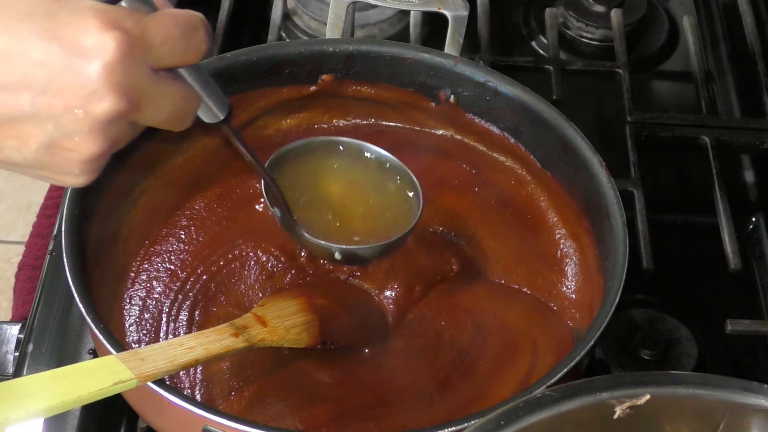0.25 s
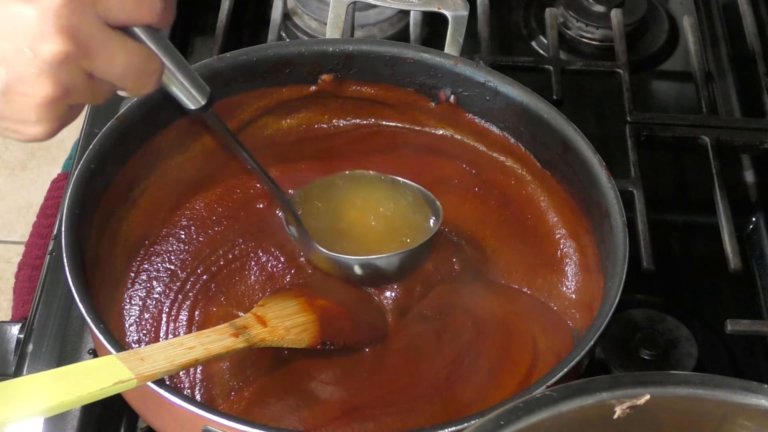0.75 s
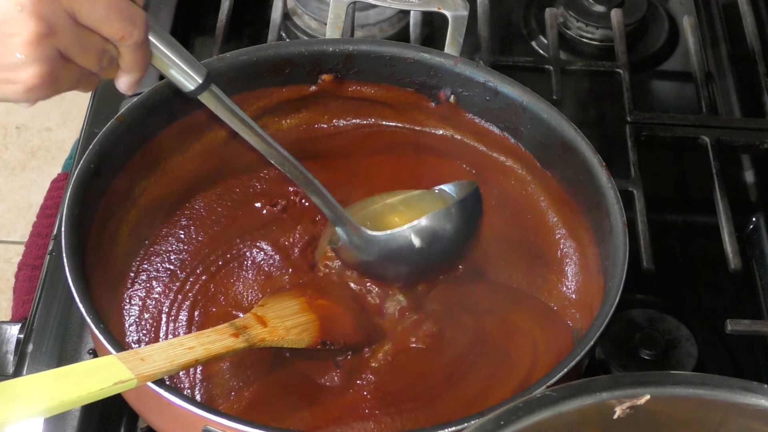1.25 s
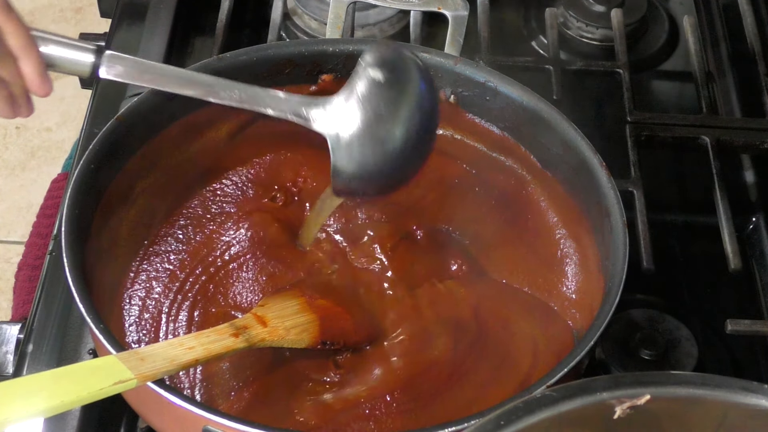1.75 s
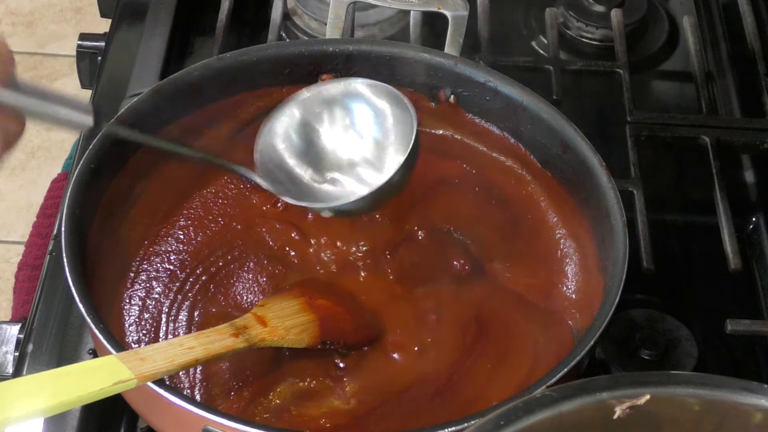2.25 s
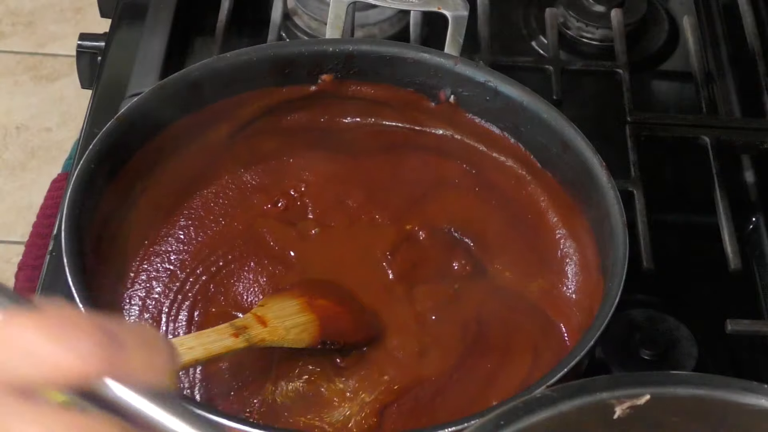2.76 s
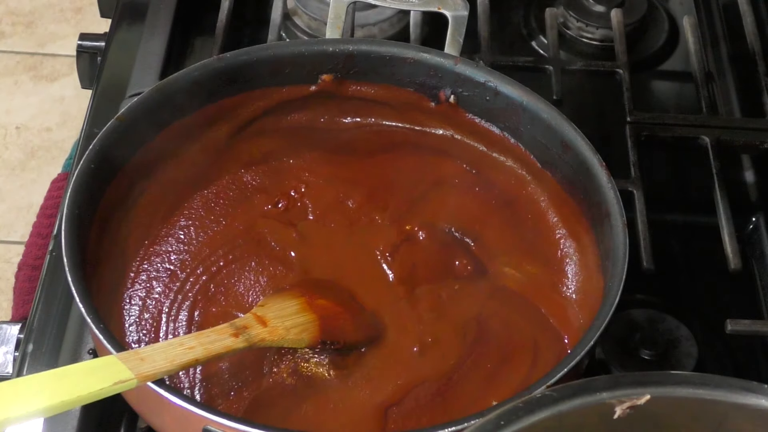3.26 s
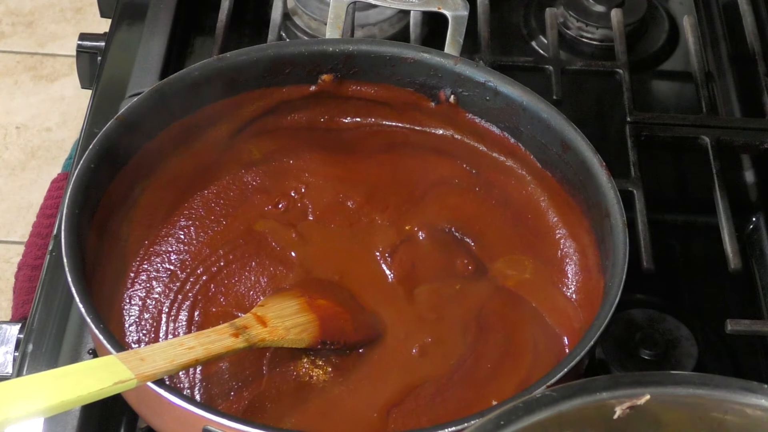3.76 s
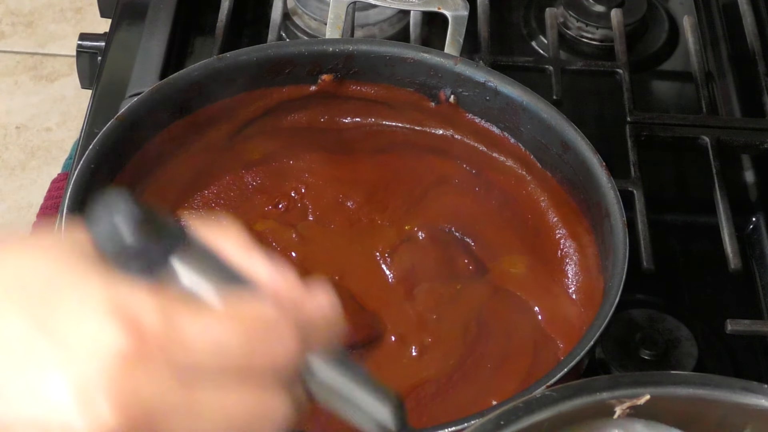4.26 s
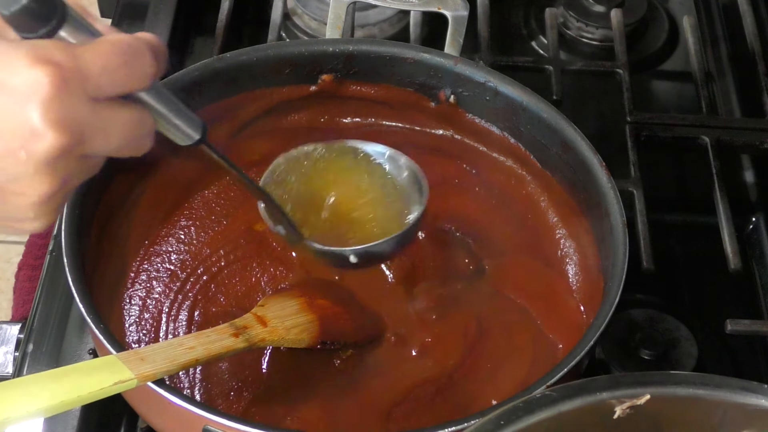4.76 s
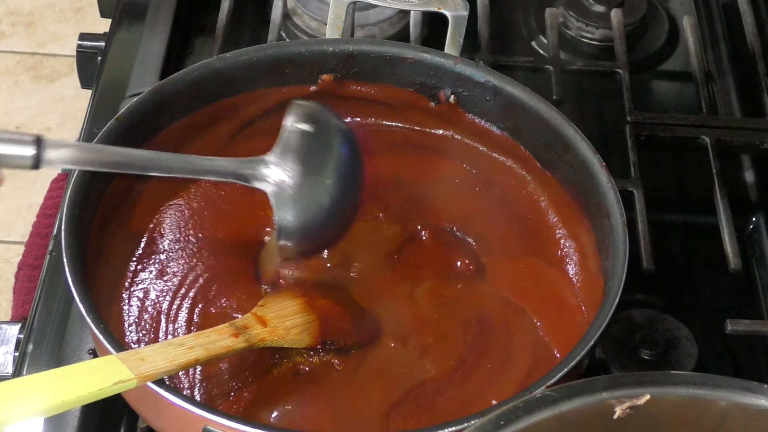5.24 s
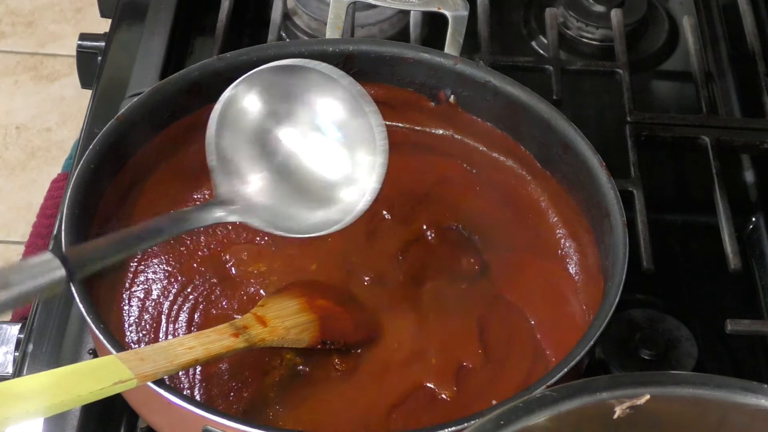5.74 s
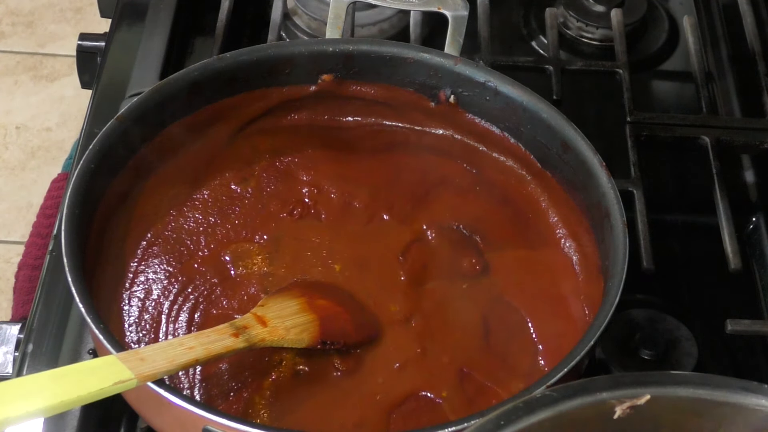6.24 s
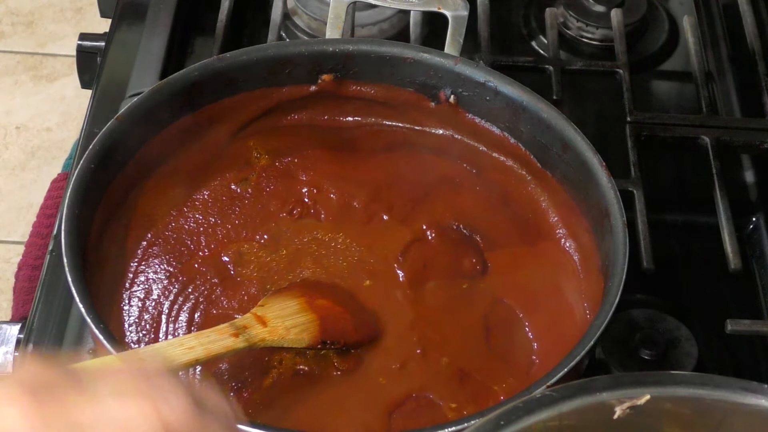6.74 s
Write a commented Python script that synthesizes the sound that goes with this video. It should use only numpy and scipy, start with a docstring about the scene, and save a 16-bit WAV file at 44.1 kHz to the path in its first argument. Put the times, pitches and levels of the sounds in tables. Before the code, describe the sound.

Bubbles pop and spit in a pan of sauce on a gas stove, until a ladle is set down hard on metal, ringing.

```python
"""Thick sauce simmers in a wide pan on a gas stove. Steam bubbles burst with short wet tones as
their hollows ring, droplets spit, and escaping steam gurgles and puffs. Under it all the burner
hums and hisses, and the kitchen gives the sauce a short echo. Near the end a steel ladle is
put down hard on metal: it rings and rocks to rest while a deep rumble swells and fades."""
import sys
import numpy as np
from scipy import signal
from scipy.fft import rfft, irfft, next_fast_len
from scipy.io import wavfile
from scipy.ndimage import map_coordinates

SR = 44100
rng = np.random.default_rng(int(sys.argv[2]) if len(sys.argv) > 2 else 0)


def log_audio(samples):
    """Write samples as a 16-bit WAV file to the path given in sys.argv[1]."""
    # one column per channel
    frames = np.atleast_2d(samples).T
    # limit to full scale, then quantise
    limited = np.clip(frames, -1, 1)
    pcm = np.round(limited * 32767).astype(np.int16)
    wavfile.write(sys.argv[1], SR, pcm)


N = 308609

# Tone colour of the burner's rumble, the sauce's seething and its fine fizz: f/Hz, level/dB
BURNER_COLOUR = [(15, -67), (25, -50), (37, -11.5), (47, -52), (69, -2.5), (103, -16), (189, -2),
                 (217, -6.5), (261, 0), (324, -6.5), (507, -11.5), (531, -23.5), (565, -19), (857, -25.5),
                 (1000, -15.5), (1300, -65), (2200, -120)]
SEETHE_COLOUR = [(470, -35), (800, -20), (995, -1), (1190, -1.5), (1990, -3), (2160, -2), (2360, -0.5),
                 (2820, -5.5), (3730, -10), (5500, -29), (7150, -70), (12100, -120)]
FIZZ_COLOUR = [(2650, -26), (4500, -0.5), (6880, -6.5), (7880, -7), (8550, -3), (11800, -0.5), (15100, -1),
               (16100, -5), (16500, -37)]
# Faint whistles of the gas jets: f/Hz, width/Hz, level/dB
GAS_WHISTLES = [(1982, 54, -65), (3784, 200, -71.5)]
# How alike the noise is on the left and right: f/Hz, likeness (1 = the same)
STEREO_LIKENESS = [(60, 0.48), (150, 0.65), (380, 0.88), (950, 0.67), (2380, 0.45), (5980, 0.81),
                   (15000, 0.6)]
# How much louder the noise and the ladle are on the left: f/Hz, left minus right/dB
NOISE_BALANCE = [(60, 3.5), (180, 1), (550, -1.0), (1650, 1.5), (4970, 0.5), (15000, -0.5)]
LADLE_BALANCE = [(150, 5.5), (350, -2.5), (1200, 0), (3000, -0.5), (12000, 0)]
# Bursting bubbles: t/s, level/dB, f/Hz, splash above the tone/dB
BUBBLE_BURSTS = [(0.0941, -35, 1510, -6.5), (0.1588, -35, 2540, -4.5), (0.1747, -40.5, 4080, -1),
                 (0.1812, -44, 1080, -10), (0.2522, -34, 2300, -9), (0.267, -34, 2560, 2.5),
                 (0.2837, -34.5, 2500, -8), (0.3217, -34, 3900, -16), (0.3244, -29, 4950, -6.5),
                 (0.3255, -29.5, 1170, -2), (0.4579, -40.5, 1170, 1), (0.4756, -46, 3940, 3),
                 (0.4848, -35.5, 2760, 4.5), (0.691, -41, 1350, -10), (0.7062, -36, 4500, 3),
                 (0.7123, -31.5, 1240, -10), (0.7806, -27.5, 2500, -9), (0.9237, -36, 1180, -1),
                 (0.9282, -39, 1010, -8), (0.9404, -48, 1045, -5), (0.9459, -40.5, 4400, 2),
                 (1.1827, -32.5, 1260, -4), (1.2079, -37, 4800, -5), (1.303, -51, 1540, -1),
                 (1.3345, -36, 4360, -13), (1.343, -31, 2360, -11), (1.3912, -45, 1910, 3),
                 (1.4391, -37.5, 1750, -27), (1.565, -49.5, 2240, 4), (1.615, -43, 2790, -14),
                 (1.6933, -31, 2340, -5), (1.89, -40, 1420, -4), (1.9038, -39.5, 1200, -12),
                 (1.95, -50, 2420, -2), (1.9771, -42, 1270, -2), (1.989, -39, 4550, -10),
                 (2.019, -39, 1650, 1), (2.0448, -41.5, 4440, -20), (2.0458, -40, 2450, 1),
                 (2.0724, -34, 1720, -8), (2.124, -42, 4800, -16), (2.1655, -41, 1110, -5),
                 (2.1812, -39.5, 2140, -8), (2.2134, -40, 2160, -2.5), (2.588, -41, 1470, -4),
                 (2.777, -37, 2360, -19), (2.792, -34, 2230, 1.5), (2.949, -47, 2900, 6),
                 (2.9674, -48, 1380, 6), (3.1334, -44, 1160, -3), (3.1472, -31.5, 2400, -8.5),
                 (3.1589, -32.5, 2620, -2.5), (3.6762, -44.5, 3850, -1.5), (3.6897, -37, 1184, -30),
                 (3.7472, -42, 1160, -7), (3.7587, -42.5, 2480, 2.5), (3.774, -33, 2420, 0),
                 (3.7874, -35, 1750, -9), (3.8805, -49, 3360, 6), (3.8905, -30.5, 4570, -14),
                 (3.9558, -32, 1810, -30), (3.9688, -28.5, 3640, -14), (4.062, -52, 1630, -20),
                 (4.076, -43, 1960, -6.5), (4.1099, -46, 1610, -13), (4.766, -51, 2140, 2),
                 (4.9255, -42, 1160, -24), (4.9402, -28.5, 2400, -6.5), (4.9415, -32, 1170, -12),
                 (4.9434, -24.5, 4600, -16), (4.9772, -19, 2316, -23), (5.0115, -25.5, 2350, -11),
                 (5.0216, -45, 2270, -7), (5.0583, -42.5, 2540, 3), (5.0876, -34.5, 1450, -14),
                 (5.257, -46.5, 1290, 0), (5.462, -35, 1790, -5.5), (5.492, -40.5, 1730, -3.5),
                 (5.874, -46.5, 2200, 6), (6.244, -49.5, 2240, 9.5)]
# Spitting droplets: t/s, level/dB, f/Hz
DROPLET_SPITS = [(0.182, -34, 9650), (0.2835, -33, 11500), (0.3144, -37, 11500), (0.3254, -21.5, 7660),
                 (0.4858, -26, 10500), (0.7126, -33.5, 9600), (0.795, -50, 11000), (0.941, -32.5, 10900),
                 (0.952, -33.5, 10200), (1.1228, -52, 11700), (1.1844, -46, 10000), (1.1915, -25.5, 8140),
                 (1.258, -51, 11600), (1.265, -36.5, 9300), (1.3703, -44.5, 9410), (1.511, -42.5, 10400),
                 (1.6422, -42, 10300), (1.6929, -27.5, 7900), (1.83, -49, 6000), (1.9345, -49, 8000),
                 (1.949, -45, 8870), (1.9759, -45, 7500), (1.9884, -41, 7710), (1.9949, -36, 11100),
                 (2.0178, -40, 9240), (2.0252, -37, 9760), (2.0448, -31.5, 9800), (2.072, -47, 6900),
                 (2.124, -42, 10000), (2.166, -52, 7000), (2.2171, -40, 10600), (2.258, -42, 12950),
                 (2.487, -44, 9900), (2.7914, -35, 10700), (2.9485, -43, 9700), (3.7727, -38.5, 12000),
                 (3.8817, -41, 8600), (3.8891, -36, 6630), (3.9544, -39.5, 8000), (3.9644, -35, 11700),
                 (4.299, -52, 10700), (4.9472, -41, 10700), (4.9761, -29, 9300), (5.0204, -40, 8500),
                 (5.1908, -39, 8100), (5.215, -44, 12000), (5.3343, -43, 11200), (5.452, -44.5, 11400),
                 (5.7872, -45, 12400), (6.058, -52, 9700)]
# Escaping steam: t/s, level/dB, f/Hz, t60/s (t60 is the time a sound takes to fade by 60 dB)
STEAM_PUFFS = [(0.255, -57, 2470, 0.1), (1.30, -54, 2000, .15), (2.59, -59, 10000, .12),
               (2.966, -47, 5000, 0.036), (3.79, -47, 1720, 0.43), (4.065, -49, 1720, 0.39),
               (4.299, -58, 8500, 0.19), (4.982, -44.5, 2320, .15), (5.11, -49, 2180, 0.18),
               (6.058, -54, 7540, .15)]
# How long the kitchen echoes: f/Hz, t60/s
ECHO_DECAY = [(300, 0.77), (2000, 0.19), (8000, 0.27), (15000, 0.097)]
# Ladle hits: t/s, level/dB, centre f/Hz, width/Hz, rise/s, t60 of the damping by contact/s
LADLE_HITS = [(6.4343, -12, 1250, 19200, 0.00015, 1.45), (6.548, -11.5, 1600, 1200, 0.002, 0.18),
              (6.734, -10, 1630, 580, 0.0053, 0.07), (6.937, -17.5, 179, 500, 0.0054, 0.13)]
# Tones the steel rings with: f/Hz, level/dB, t60/s
STEEL_TONES = [(182, -17.5, 2), (370, -27, 2.5), (418, -22, 0.65), (485.5, -19.5, 1.35), (670, -36.5, 4.6),
               (1047, -20, 0.32), (1369, -28.5, 0.85), (1456, -25, 1.2), (1400, -26, 2.1), (1562, -31, 4.1),
               (1730, -26, 2.3), (2220, -20.5, 0.35), (2350, -28, 2.53), (2875, -9, 0.14),
               (2890, -23, 0.39), (3065, -19, 1.6), (3096, -20, 0.72), (3620, -21, 0.62),
               (3660, -19.5, 0.31), (4010, -29, 1.7), (4180, -16, 0.21), (4800, -33, .5),
               (4940, -8.5, 0.035), (5700, -29, 1.9), (5500, -38, 1.2), (8160, -38, 1.1), (9300, -45, 0.77)]
# The clash, a ringing too dense to hear as single tones: f/Hz, level/dB
CLASH_COLOUR = [(35, -54.5), (60, -22), (103, -48), (176, 7), (281, -26), (492, 13), (593, -24),
                (767, -10.5), (1380, 9.5), (1910, 2.5), (2970, 9.5), (3340, 4.5), (5720, 1.5), (7230, -12),
                (16000, -13)]
# How long the clash lasts: f/Hz, t60/s
CLASH_FADE = [(150, 1), (500, 1), (1600, 1.0), (3000, 1), (4600, 0.98), (5500, 0.81), (6500, 1),
              (9000, 0.84), (15000, 0.23)]
# Hums that linger after the first hit: f/Hz, width/Hz, level/dB
LINGERING_HUMS = [(447, 25, 0), (750, 760, -15), (1657, 86, -1), (2600, 980, -19.5), (5460, 630, -22)]

SEETHE_DB, FIZZ_DB = -60.5, -66  # calm sauce
SEETHE_DB_PER_BURST, FIZZ_DB_PER_SPIT = 0.57, 0.33
USUAL_HZ, USUAL_SPLASH_DB, RING_T60_S, SPLASH_T60_S = 2000, -44, 0.019, 0.033  # an ordinary burst
THUMP_DB, THUMP_DB_PER_SPLASH_DB, THUMP_DB_PER_OCTAVE = -56, 0.56, -3  # big, low bubbles thump hardest
PLOP_HZ, PLOP_WIDTH_HZ, PLOP_OVER_THUMP_DB, PLOP_T60_S = 633, 1150, 4.5, 0.029
SPREAD_S, SPREAD_DB = 1.0e-5, 1.7  # left-right scatter over the pan, in delay and level
DEEP_RUMBLE_HZ, DEEP_RUMBLE_DB = 45.7, -58
TOP_HZ = 15900


def amp(db):
    """Turns decibels into a factor to multiply by."""
    return 10 ** (np.asarray(db) / 20)


def unit(x):
    """Scales a sound to an average (rms) strength of 1."""
    return x / np.sqrt(np.mean(x ** 2) + 1e-20)


def fade(t, t60):
    """Falls by 60 dB every t60 seconds."""
    return amp(-60 * t / t60)


def rise(t, seconds):
    """Climbs from 0 towards 1, most of the way in the given time."""
    return 1 - np.exp(-t / seconds)


def along(points, hz):
    """Reads between the rows of an (f/Hz, value) table, on a log frequency scale."""
    f, v = np.transpose(points)
    return np.interp(np.log(hz + 1), np.log(f + 1), v)


def wobble(rate):
    """A smooth random curve through rate new values a second."""
    return map_coordinates(rng.standard_normal(int(N * rate / SR) + 4), [np.arange(N) * rate / SR])


def lumps(t, rate, db):
    """An uneven loudness that strays by about db, rate times a second."""
    return amp(db * np.interp(t * rate, np.arange(64), rng.standard_normal(64)))


def filtered(x, response):
    """Scales each frequency f in x by response(f)."""
    n = x.shape[-1]
    padded = next_fast_len(n + 2048)
    return irfft(rfft(x, padded) * response(np.fft.rfftfreq(padded, 1 / SR)), padded)[..., :n]


def resonance(f, centre_hz, width_hz):
    """A filter curve that favours frequencies near the centre."""
    return 1j * f * width_hz / (centre_hz ** 2 - f * f + 1j * f * width_hz)


def band_noise(t, hz, width_hz, steepness=2):
    """Noise around one pitch, as long as t."""
    return unit(filtered(rng.standard_normal(len(t)), lambda f: resonance(f, hz, width_hz) ** steepness))


def lean(pair, balance):
    """Tips each frequency to the left or right."""
    return filtered(pair, lambda f: amp(np.outer([.5, -.5], along(balance, f))))


def rush(gain):
    """Steady stereo noise coloured by gain(f), partly alike on both sides."""
    def split(f):
        angle = np.arccos(np.clip(along(STEREO_LIKENESS, f), -1, 1)) / 2
        return gain(f) * np.array([np.cos(angle), np.sin(angle)])

    mid, side = filtered(rng.standard_normal((2, N)), split)
    return unit(lean(np.array([mid + side, mid - side]), NOISE_BALANCE))


def dying_noises(decay, seconds, gain=np.ones_like):
    """Two noises in which each frequency fades at its own speed."""
    hz, t, bands = signal.stft(rng.standard_normal((2, int(seconds * SR))), SR, nperseg=256)
    bands = bands * gain(hz)[:, None] * fade(t, along(decay, hz)[:, None])
    return signal.istft(bands, SR, nperseg=256)[1]


def add(track, start_s, sound):
    """Mixes a sound into the track at the given time."""
    part = track[..., round(start_s * SR):][..., :sound.shape[-1]]
    part += sound[..., :part.shape[-1]]


def busy(events, reach_s=0.077):
    """A smooth count of the events near each moment."""
    times = np.arange(0, N / SR + .02, .02)
    gaps = times[:, None] - np.array(events)[:, 0]
    count = np.exp(-.5 * (gaps / reach_s) ** 2).sum(axis=1)
    return np.interp(np.arange(N) / SR, times, count)


def burner():
    """The gas flame rumbles with a slight flutter, and its jets whistle faintly."""
    rumble = amp(-56 + .8 * wobble(4)) * rush(lambda f: amp(along(BURNER_COLOUR, f)))
    jets = sum(amp(db) * rush(lambda f: np.abs(resonance(f, hz, width)) ** 2)
               for hz, width, db in GAS_WHISTLES)
    return rumble + jets


def simmer():
    """The sauce seethes and fizzes in quick small swells, louder where bursts and spits crowd."""
    swell_db = 1.2 * wobble(14)
    seethe_db = SEETHE_DB + SEETHE_DB_PER_BURST * busy(BUBBLE_BURSTS) + swell_db
    fizz_db = FIZZ_DB + FIZZ_DB_PER_SPIT * busy(DROPLET_SPITS) + .5 * swell_db
    seethe = amp(seethe_db) * rush(lambda f: amp(along(SEETHE_COLOUR, f)))
    fizz = amp(fizz_db) * rush(lambda f: amp(along(FIZZ_COLOUR, f)))
    return seethe + fizz


def bubble(hz, t60, splash_db, splash_t60, thump_db):
    """The hollow rings with rising pitch, the torn skin snaps and splashes, the sauce thumps the pan."""
    t = np.arange(SR // 8) / SR
    waver = np.cumsum(rng.standard_normal(len(t))) * hz * 2.5e-5  # the soft wall unsettles the pitch
    tone = np.sin(2 * np.pi * hz * (t + 1.2 * t * t) + waver) * fade(t, t60) * rise(t, 0.00025)
    splutter = lumps(t, rate=350, db=4.5) * rng.standard_normal(len(t))
    wet = filtered(splutter, lambda f: (resonance(f, 2100, 2200) * resonance(f, hz, 1.5 * hz)) ** 2)
    splash = amp(splash_db) * unit(wet) * fade(t, splash_t60)
    thump = amp(thump_db) * band_noise(t, hz=200, width_hz=200) * fade(t, 0.16)
    snap = amp(splash_db - 1) * band_noise(t, hz=3200, width_hz=4500, steepness=3) * fade(t, 0.0046)
    return tone + snap + (splash + thump) * rise(t, 0.0016)


def burst(db, hz, splash_db):
    """A bubble pops and its crater falls in with a plop. Big, low bubbles ring and splash longest."""
    t = np.arange(SR // 8) / SR
    pitch_ratio = hz / USUAL_HZ
    ring_t60 = RING_T60_S / pitch_ratio ** .5
    splash_t60 = SPLASH_T60_S / pitch_ratio ** .25
    extra_splash_db = db + splash_db - USUAL_SPLASH_DB
    thump_db = THUMP_DB + THUMP_DB_PER_SPLASH_DB * extra_splash_db
    thump_db += THUMP_DB_PER_OCTAVE * np.log2(pitch_ratio)
    plop = amp(thump_db + PLOP_OVER_THUMP_DB) * band_noise(t, PLOP_HZ, PLOP_WIDTH_HZ)
    plop *= fade(t, PLOP_T60_S) * rise(t, .0015)
    return plop + amp(db) * bubble(hz, ring_t60, splash_db, splash_t60, thump_db - db)


def spit(db, hz):
    """A droplet clicks, then gives a short, high crack."""
    t = np.arange(SR // 32) / SR
    noise = rng.standard_normal(len(t))
    crack = unit(filtered(noise, lambda f: resonance(f, hz, .55 * hz) ** 2 / (1 + 1j * f / 11000)))
    crack *= fade(t, 0.0098) * rise(t, 0.00032)
    click = amp(15.5) * filtered(1. * (t == 0), lambda f: resonance(f, hz, .9 * hz) ** 2)
    return amp(db - 2.5) * (crack + click)


def puff(db, hz, t60):
    """Steam escapes in lumps: a low gurgle through the sauce or a high hiss."""
    t = np.arange(SR // 5) / SR
    hiss = unit(lumps(t, rate=200, db=3.5) * band_noise(t, hz, 0.54 * hz))
    return amp(db) * hiss * fade(t, t60) * rise(t, 0.0057)


def sauce():
    """Bursts, spits and puffs spread over the pan, with faint random bubbles and droplets between."""
    out = np.zeros((2, N))

    def place(start_s, sound):
        side = rng.standard_normal()
        lag = round(side * SPREAD_S * SR)  # the far side hears it later
        pair = [np.roll(sound, max(delay, 0)) for delay in (-lag, lag)]
        add(out, start_s, amp(SPREAD_DB * side * np.array([[.5], [-.5]])) * pair)

    for table, source in ((BUBBLE_BURSTS, burst), (DROPLET_SPITS, spit), (STEAM_PUFFS, puff)):
        for start_s, *settings in table:
            place(start_s, source(*settings))
    for when, pitch, size in rng.random((70, 3)):
        pop = bubble(1100 * 2.6 ** pitch, t60=0.044, splash_db=-13.5, splash_t60=0.029, thump_db=-14)
        place(when * N / SR, amp(-59 + 5.9 * size) * pop)
    for when, pitch, size in rng.random((10, 3)):
        place(when * N / SR, spit(db=-53 + 4 * size, hz=7000 * 1.7 ** pitch))
    return out


def kitchen_echo(sound):
    """The pan wall and kitchen throw sound back; each short stretch gets its own echo tail."""
    out, step = np.zeros((2, N)), SR // 8
    for start in range(0, N, step):
        shared, side = dying_noises(ECHO_DECAY, seconds=0.2)
        tail = np.array([shared + 0.26 * side, shared - 0.24 * side])
        tail /= np.linalg.norm(tail[0])
        add(out, start / SR + .004, signal.fftconvolve(sound[None, start:start + step], tail, axes=1))
    return out


def steel_ring(t):
    """Struck steel rings with many tones at once; the loose contact makes each one waver."""
    wavers = np.cumsum(rng.standard_normal((len(STEEL_TONES), len(t))), axis=1) * .004
    scatters = rng.normal(0, 1.5, (len(STEEL_TONES), 2, 1))  # each side has its own level and phase
    return sum(amp(db + scatter) * fade(t, t60) * np.sin(2 * np.pi * hz * t + waver + .32 * scatter[::-1])
               for (hz, db, t60), waver, scatter in zip(STEEL_TONES, wavers, scatters))


def ladle():
    """Each hit cracks, clashes and rings until the contact damps it; the first leaves a hum."""
    out, t = np.zeros((2, N)), np.arange(int(.6 * SR)) / SR
    for start_s, db, hz, width_hz, rise_s, contact_t60 in LADLE_HITS:
        ring = steel_ring(t)
        shared, side = dying_noises(CLASH_FADE, .6, lambda f: amp(along(CLASH_COLOUR, f)))[:, :len(t)]
        clash = amp(-22.5) * unit(np.array([shared + 0.16 * side, shared - 0.33 * side]))
        crack = amp(-7) * rng.standard_normal(len(t)) * fade(t, 0.01)
        hit = (ring + clash + crack) * rise(t, rise_s) * fade(t, contact_t60)
        add(out, start_s, amp(db) * filtered(hit, lambda f: resonance(f, hz, width_hz) ** 2))
    hum = rush(lambda f: sum(amp(db) * np.abs(resonance(f, hz, width)) ** 1.59
                             for hz, width, db in LINGERING_HUMS))
    hum *= amp(-39 + 3 * wobble(25.75))
    add(out, LADLE_HITS[0][0], hum[:, :len(t)] * fade(t, 3.4))
    return lean(out, LADLE_BALANCE)


def deep_rumble():
    """A deep, low rumble swells and fades as the ladle is put down."""
    t = np.maximum(np.arange(N) / SR - LADLE_HITS[0][0], 0)
    rumble = rush(lambda f: np.abs(resonance(f, DEEP_RUMBLE_HZ, width_hz=35)) ** 2)
    return amp(DEEP_RUMBLE_DB) * rumble * rise(t, 0.066) * fade(t, 2.8)


def scene():
    """Mixes burner, sauce, ladle and rumble; only the sauce's pops get the echo."""
    pops = sauce()
    steel = ladle()
    echo = amp(-6) * kitchen_echo(pops.mean(axis=0))
    pops *= amp([[.4], [-.4]])  # slightly to the left
    return burner() + simmer() + pops + echo + steel + deep_rumble()


def record(dry):
    """Cuts away the very highest treble."""
    return filtered(dry, lambda f: f < TOP_HZ)


dry = scene()
out = record(dry)
log_audio(out)
```